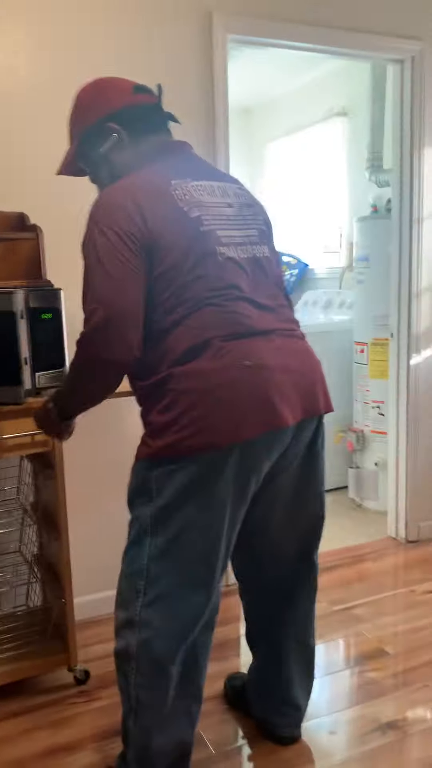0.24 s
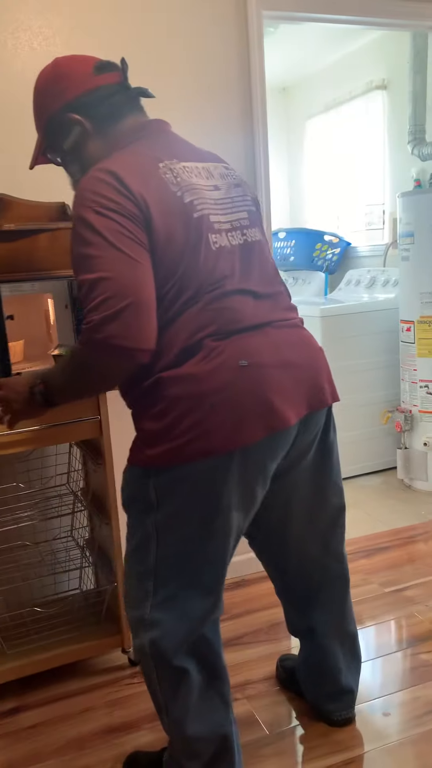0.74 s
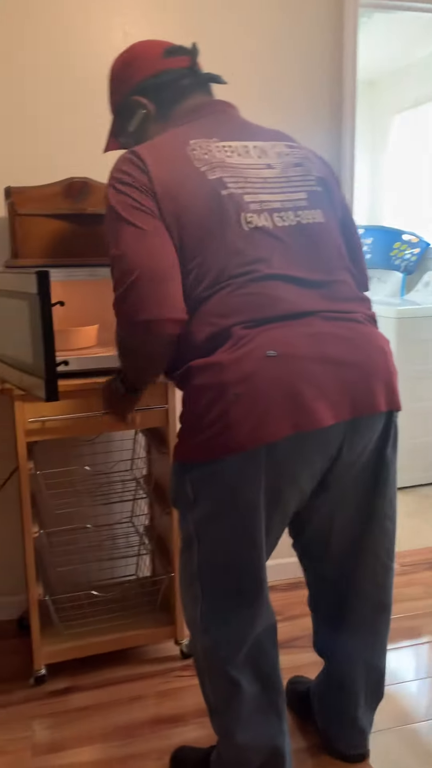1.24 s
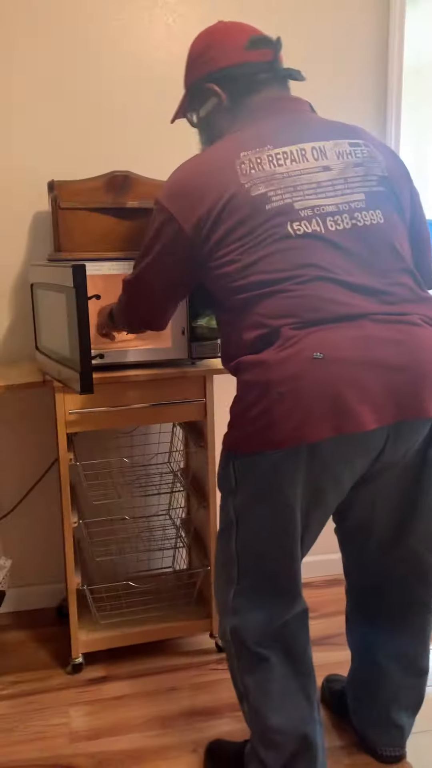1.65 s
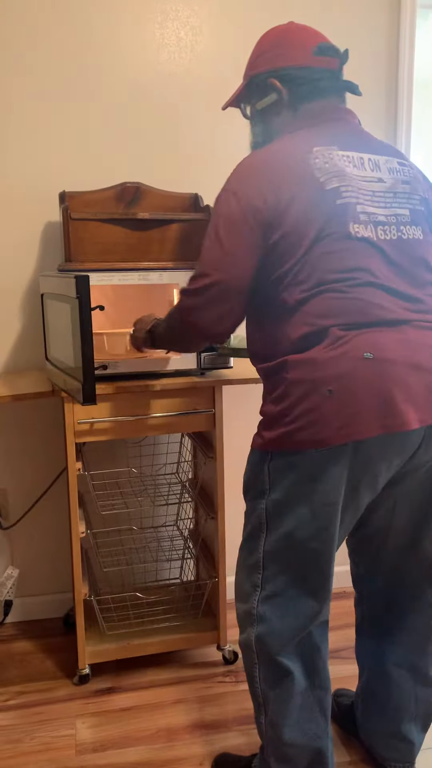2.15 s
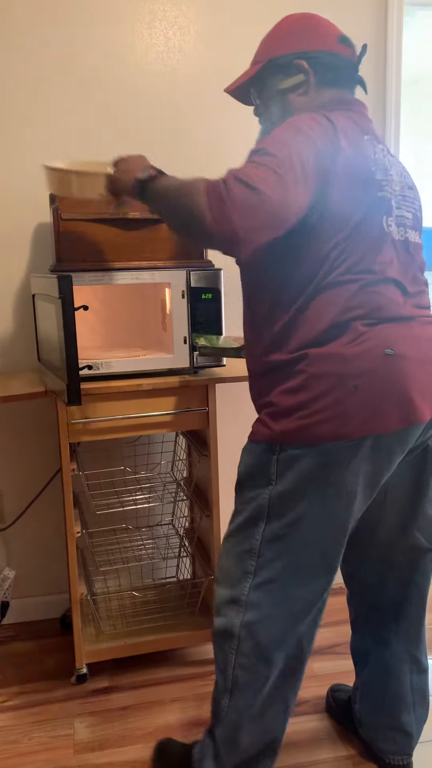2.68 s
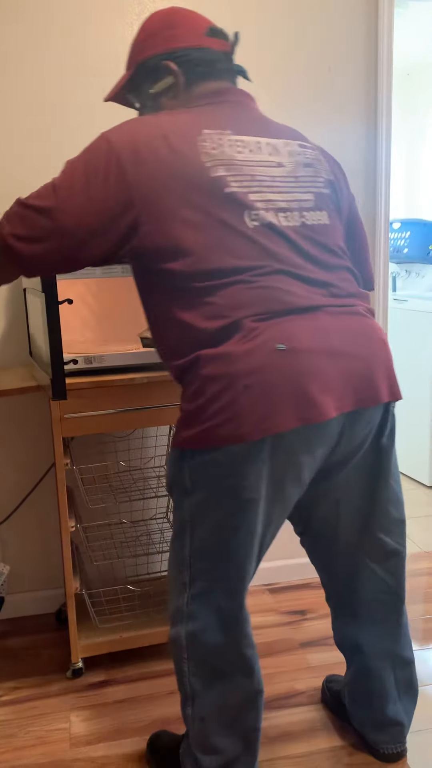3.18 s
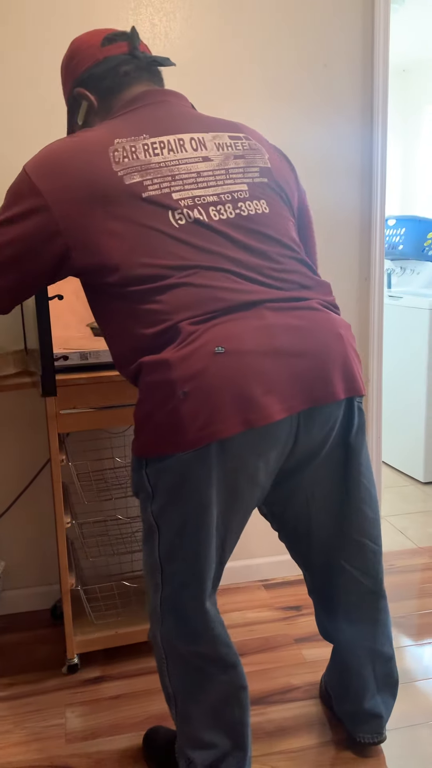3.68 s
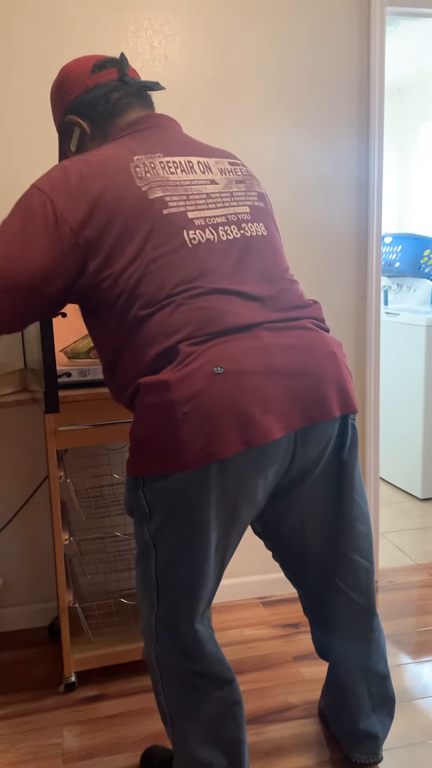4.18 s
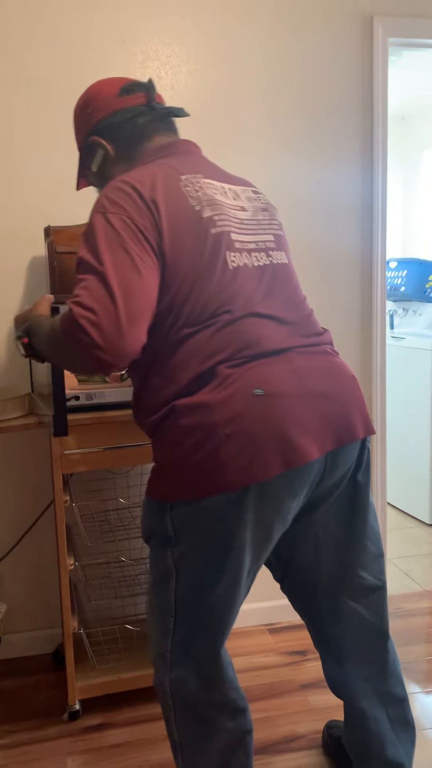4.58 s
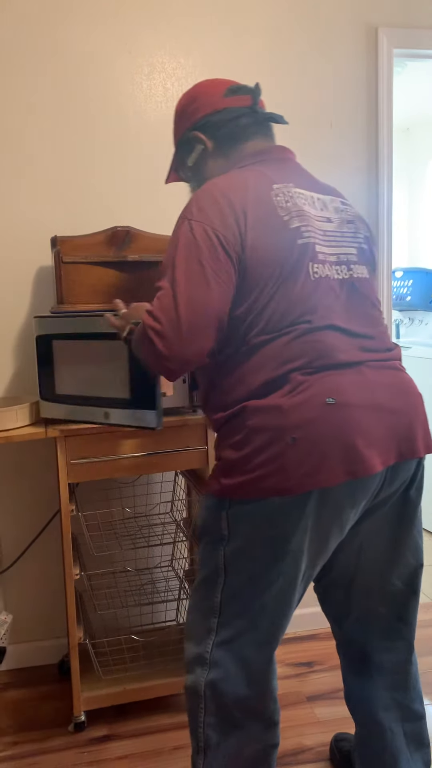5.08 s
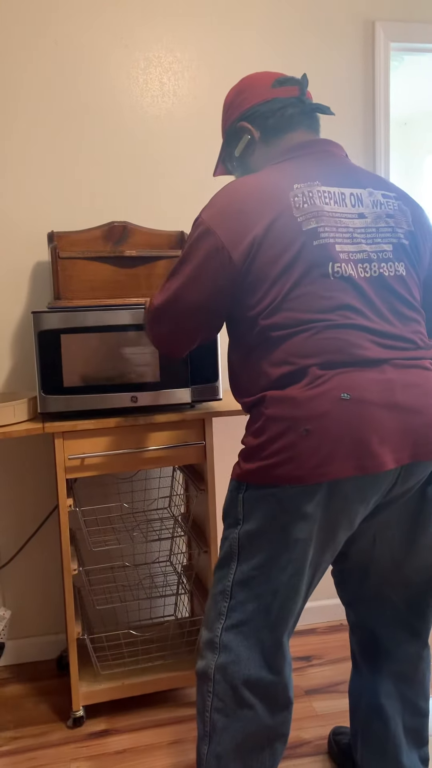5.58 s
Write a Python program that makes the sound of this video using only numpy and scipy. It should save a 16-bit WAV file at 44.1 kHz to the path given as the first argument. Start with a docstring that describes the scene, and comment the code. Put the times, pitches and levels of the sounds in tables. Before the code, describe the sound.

A microwave door unlatches, a tray slides out and lands with a rattle, then the door shudders and snaps shut over a steady kitchen hum.

```python
"""A humming kitchen: a microwave door swings open, a paper tray is slid out and things are set down.
The glass turntable clinks, the door is pushed round with a hollow shudder, and its latch snaps shut.
Blows are short bursts of tiny impacts through a filter; ringing objects are sums of fading tones.
Sliding and moving air are shaped noise, and the motors are wavering tones.
Handling echoes in the room; all is heard by a closely spaced pair of microphones a few metres away."""
import sys
import numpy as np
from scipy import signal
from scipy.fft import rfft, irfft, next_fast_len
from scipy.io import wavfile
from scipy.ndimage import uniform_filter1d

SR = 44100
rng = np.random.default_rng(int(sys.argv[2]) if len(sys.argv) > 2 else 0)


def put_to_file(sound):
    """Save the sound as 16-bit audio at rate SR, in the file named by the first command-line argument."""
    columns = np.atleast_2d(sound).T  # one column per channel
    safe = np.clip(columns, -1, 1)
    whole_steps = np.round(safe * 32767)
    wavfile.write(sys.argv[1], SR, whole_steps.astype(np.int16))


N = 257103
TIME, FREQS = np.arange(N) / SR, np.fft.rfftfreq(N, 1 / SR)

# Levels are those going into the next step; ring levels add to the level of each blow.
# single blows on door, latch, tray and counter: start_s, knock_db, knock_pitch_hz, sharpness_q,
# chatter_s, click_db, click_brightness_db_per_octave
BLOWS = [(0.001, -3, 680, 0.29, 0.035, -18.5, 3), (1.868, -14, 2120, 9.1, 0.073, -40, -14),
         (2.044, -4.5, 910, 12, 0.014, -34, -10), (2.051, -12, 755, 1.9, 0.016, -20.5, -15),
         (2.0905, -5, 1310, 6.2, 0.008, -42, 1), (2.0912, -11.5, 3260, 5.5, .012, -35, -1),
         (2.093, -11.5, 1700, 3.5, 0.022, -42, -3), (3.4142, -3.5, 2150, 0.95, 0.0028, -21.5, 0),
         (3.9787, -9, 610, 4.7, 0.015, -31, 0), (4.416, -11, 2400, 1.5, 0.013, -26, -8),
         (4.694, -10, 700, 0.55, 0.0062, -24, 4), (5.585, -6, 1006, 0.61, 0.029, -17, 5.5),
         (5.62, -11.5, 500, 1.3, .02, -34, 2), (5.772, -10.5, 1100, 0.49, 0.026, -27, 4),
         (5.808, -1.5, 1380, 0.4, 0.061, -8, -12), (5.8195, 1, 1500, 0.54, 0.018, -3, 3),
         (5.8225, 14.5, 497, 0.92, 0.024, 5.5, 6)]
# tone colour of every knock: pitch_hz, level_db
KNOCK_TONE = [(100, 1), (400, 6), (1000, 1.5), (2000, -1), (2600, -6), (3500, -4.5), (4500, -8),
              (7000, -11.5), (16000, -45)]
# tone colour of every click: pitch_hz, level_db
CLICK_TONE = [(500, -51), (2500, 3), (4000, -29), (5500, 6), (7000, 1.5), (9000, -0.5), (12000, -6.5),
              (15000, -11.5)]
# the pushed door jolts unevenly on its hinge: start_s, knock_db, knock_pitch_hz, click_db
DOOR_JOLTS = [(4.711, -19, 795, -30), (4.722, -8.5, 630, -34), (4.7284, -13, 2040, -34),
              (4.736, -18, 1250, -32), (4.748, -7, 394, -38), (4.757, -9.5, 1080, -34),
              (4.771, -6, 384, -41), (4.783, -13.5, 695, -42), (4.791, -14, 1070, -40),
              (4.795, -11, 328, -39), (4.808, -8.5, 353, -41), (4.849, -14, 1070, -45),
              (4.863, -16, 1060, -46), (4.877, -14, 390, -49)]
JOLT_Q, JOLT_CHATTER_S = 6.8, 0.0052
# loose parts of the door that each jolt shakes: pitch_hz, level_db, time_to_fall_60_db_s
DOOR_RING = [(320, -30, 0.097), (385, -33, 0.22), (600, -42, .13), (754, -42, 0.16), (1045, -40, .2),
             (1088, -35, 0.27), (1880, -46, 0.11), (2120, -49, 0.19)]
# the load rattles to rest on the counter in uneven contacts: start_s, knock_db, knock_pitch_hz
LOAD_RATTLE = [(3.419, -4, 950), (3.4235, -12, 1200), (3.431, -8, 720), (3.4428, -5.5, 516),
               (3.4433, -12, 1150), (3.453, -9, 860), (3.462, -17, 1050), (3.486, -7, 477),
               (3.494, -13, 850), (3.507, -15, 560), (3.528, -11, 484)]
RATTLE_Q, RATTLE_CHATTER_S = 4.5, 0.0034
# light ticks of tray, fingers and clothes: start_s, level_db, chatter_s, brightness_db_per_octave
LIGHT_TICKS = [(.815, -31, .0004, 8), (0.8652, -30.5, .0003, 2), (.8664, -30, .0004, 0),
               (2.7298, -35, .0002, 2), (2.737, -28.5, .002, -4), (4.677, -35, .003, 2),
               (4.704, -28, .002, 8), (5.3608, -34.5, 0.0032, 1)]
# ring of the wooden counter, then the short tones of its hard crack:
# pitch_hz, level_db, time_to_fall_60_db_s
COUNTER_RING = [(401.5, -0.5, 0.65), (494, 1.5, 0.66), (590, -5, 0.18), (760, -14, .4), (822, 0, .3),
                (897, 0, 0.24), (994, -2, 0.3), (1055, -4, 0.42), (1240, -8, 0.68), (1631, -8, 0.2),
                (1800, -8, 0.11), (2030, -5, 0.15), (2250, -8, 0.17), (3040, -8, 0.11), (3460, -3, 0.11),
                (895, 11, 0.035), (1500, -5, 0.016), (2126, 8.5, 0.036), (3360, 6, 0.051)]
# the load meets the counter: start_s, level_db, rise_s
COUNTER_HITS = [(3.4137, -35, 0.00037)]
# ring of the oven's thin floor as the tray drops over its edge, then the short tones of the clack:
# pitch_hz, level_db, time_to_fall_60_db_s
FLOOR_RING = [(904, -12, 0.23), (1147, -9, 0.3), (1384, -8, .2), (1422, 1, 0.23), (1610, -9, 0.25),
              (1657, -3, 0.34), (1825, -8, 0.2), (1970, -5.5, 0.38), (2550, -9, 0.17), (3010, -22, 0.22),
              (3010, -5, .12), (3510, -14, 0.11), (1150, 5, 0.032), (1450, 13, 0.025), (1860, 11, 0.034),
              (3450, 8, .02)]
# the tray catches, then drops: start_s, level_db, rise_s
TRAY_DROPS = [(2.051, -49, 0.0011), (2.064, -45, .001), (2.0882, -34.5, 0.0014)]
# ring of the latch spring and its hooks: pitch_hz, level_db, time_to_fall_60_db_s
LATCH_RING = [(1313, 4, 0.18), (2023, -8, 0.25), (2390, -1, 0.13), (3210, 7.5, 0.22)]
# the latch lets go and snaps home: start_s, level_db, rise_s
LATCH_HITS = [(.003, -48, .002), (5.822, -43, .001)]
# ring of the glass turntable: pitch_hz, level_db, time_to_fall_60_db_s
GLASS_RING = [(1010, -1.5, 0.38), (1087, 0.5, 0.51), (1192, -4.5, 0.89), (1630, -4, 0.18), (1960, -5, 0.28),
              (2590, -2, 0.29), (2630, -7, 0.49), (2850, -11, .2), (2955, -6.5, 0.38), (3280, -3, 0.095),
              (3335, -5, 0.39), (3600, -9, 0.15), (3720, -8, 0.76), (3790, -10, .35), (4118, -6, .25),
              (4640, -3, .18), (4900, -1, 0.3), (5437, -18, .3), (6080, -19, .2), (6300, -18, 0.25),
              (6950, -22, 0.18), (7800, -21, 0.25), (9600, -13, .12)]
# the turntable rocks on its rollers: start_s, level_db, rise_s
GLASS_CLINKS = [(4.4145, -40.5, 0.0026), (4.4209, -52, .001), (4.439, -52, .002), (4.482, -53, .002),
                (4.694, -52, 0.0022), (4.77, -54, .002)]
# hollow ring of the oven's steel case and door: pitch_hz, level_db, time_to_fall_60_db_s
CASE_RING = [(171, -2, 0.25), (185, 3.5, 0.18), (201.4, -2.5, 0.29), (235, -15.5, 0.22), (336, -9, 0.4),
             (382, -12, 0.47), (633, -15.5, 0.43), (730, -20, 0.66), (1060, -17, 0.41), (1385, -24, .41)]
# pushes that set the case ringing: start_s, level_db, rise_s
CASE_THUDS = [(0.001, -35, 0.0081), (2.1, -38, 0.0032), (4.702, -21.5, 0.012), (4.79, -28, 0.0022),
              (5.601, -44, 0.013)]
# low boom of the counter's frame: pitch_hz, level_db, time_to_fall_60_db_s
FRAME_RING = [(166, -0.5, 0.24), (232.6, -0.5, 0.39)]
# the frame takes the weight a moment after the counter: start_s, level_db, rise_s
FRAME_HITS = [(3.427, -29.5, .003)]
# dull pushes of tray on cart, hand on door and heel on floor: start_s, level_db, pitch_hz, swell_s
DULL_PUSHES = [(2.098, -29.5, 190.4, 0.011), (4.69, -26, 182, 0.011), (5.625, -43, 42, .035)]
# sliding strokes of hinge, sleeve, tray (in and out) and hand:
# peak_s, level_db, rise_s, fall_s, brightness_db_per_octave
SLIDES = [(0.215, -56, 0.15, 0.033, 21), (1.08, -50, 0.019, 0.053, 1), (2.02, -44, 0.2, 0.17, -4.5),
          (2.4, -54, 0.26, 0.26, -1), (4.7, -45, 0.04, 0.084, 0)]
SLIDE_SHAPE = 1.54  # 1 = pointed, 2 = rounded top
# tone colour of the rubbing: pitch_hz, level_db
RUB_TONE = [(400, -20), (1200, -5), (2200, -7), (4000, -5.5), (6700, -6), (8000, -16), (12000, -21),
            (15000, -23)]
# the sliding tray whistles thinly until it comes free
SQUEAK_START_S, SQUEAK_END_S, SQUEAK_EDGE_S = 2.14, 2.8, 0.033
SQUEAK_DB, SQUEAK_FADE_DB_PER_S = -61, -14
# motor tones of the kitchen appliances, close ones beat: pitch_hz, rms_level_db
MOTORS = [(57.7, -60), (98.8, -57.5), (106.6, -45.5), (115.6, -60.5), (173, -53), (240, -57.5),
          (319.7, -54), (399.7, -57), (866.5, -63)]
# tone colour of the fans' moving air: pitch_hz, level_db
FAN_AIR = [(20, -24), (45, -11.5), (65, -3), (130, -6), (170, 1), (265, -1.5), (400, -1), (560, -4.5),
           (800, -6), (2000, -14), (2700, -19), (4500, -25), (6500, -34), (8500, -43.5), (12000, -45.5),
           (16000, -66)]
FAN_AIR_DB = -38.5
# duct resonances in that air: pitch_hz, width_hz, gain_db
FAN_DUCTS = [(299, 32, 6.5), (426, 41, 5), (528, 54, -3.5), (766, 30, 4.5), (1435, 37, 4), (1650, 67, 3),
             (2045, 210, 5), (6370, 1330, 5.5)]
# how long the room's echoes last: pitch_hz, time_to_fall_60_db_s
ROOM_ECHO = [(100, 0.38), (400, 0.54), (1500, 0.57), (4000, 0.49), (8000, 0.61), (16000, 0.12)]
# share of the left-right difference the microphones keep: pitch_hz, level_db
PAIR_WIDTH = [(100, -56), (300, -13.5), (500, -7), (730, -3.5), (1200, -4.5), (2000, -8), (2800, -1.5),
              (3700, -5.5), (4700, -20), (8000, -134)]
# how far the left microphone is ahead: pitch_hz, lead_radians
PAIR_LEAD = [(0, 0), (400, -.3), (520, -.8), (1100, -.8), (1300, -.1), (2550, .5), (4700, np.pi),
             (17500, 7 * np.pi)]
# left level minus right level: pitch_hz, difference_db
PAIR_BALANCE = [(60, 0.9), (350, 2.5), (520, 1), (800, -1.5), (1300, -0.5), (3000, -0.5), (4500, 2)]
EDGE_HZ = 15750  # top of the heard band


def amp(db):
    """Turns decibels into a gain."""
    return 10 ** (np.asarray(db) / 20)


def unit(x):
    """Scales to an rms of 1."""
    return x / np.sqrt(np.mean(x ** 2) + 1e-20)


def read(points, hz):
    """Reads a table between its points on a log-frequency axis."""
    f, value = np.transpose(points)
    return np.interp(np.log(hz + 1), np.log(f + 1), value)


def add(mix, s, sound):
    """Mixes a sound in at time s."""
    part = mix[max(round(s * SR), 0):][:len(sound)]
    part += sound[:len(part)]


def noise(db):
    """Two unrelated channels of noise with the spectrum db, scaled to an rms of 1."""
    return unit(irfft(rfft(rng.standard_normal((2, N))) * amp(db), N))


def drift(rate_hz):
    """Random wandering of rms 1, mostly slower than rate_hz."""
    spectrum = rfft(rng.standard_normal(N)) / (1 + (FREQS / rate_hz) ** 4)
    return unit(irfft(spectrum, N))


def impulse(colour, size=2048):
    """Pulse of energy 1 that starts at once and has the spectrum colour(Hz) in dB."""
    log_gain = np.log(amp(colour(abs(np.fft.fftfreq(size, 1 / SR)))))
    # the phase that follows from the gain puts the energy as early as possible
    pulse = np.fft.ifft(np.exp(np.conj(signal.hilbert(log_gain)))).real
    return pulse / np.linalg.norm(pulse)


def contact(chatter, first_s=0.00074, lead=0.59, size=8192):
    """One impact, then a dying chatter of tiny ones; energy 1."""
    t = np.arange(size) / SR
    strength = np.sqrt(chatter / (chatter + first_s) / (first_s * SR))
    force = strength * rng.standard_normal(size) * np.exp(-t / chatter)
    force[0] = lead
    return force / np.linalg.norm(force)


def knock(db, hz, q, chatter):
    """One blow excites one resonance; a higher q makes it narrower."""
    def body(f):
        resonance = 1 + (q * (f / hz - hz / (f + 1))) ** 2
        return read(KNOCK_TONE, f) - 10 * np.log10(resonance)
    return amp(db) * signal.fftconvolve(contact(chatter), impulse(body))


def clicks(touches):
    """Hard surfaces meet with a click, brighter for plastic; rows: start_s, chatter_s, db, db per octave."""
    out = np.zeros(N)
    for s, chatter, db, bright in touches:
        def colour(f):
            return read(CLICK_TONE, f) + bright * np.log2(np.maximum(f / 5000, 1))
        add(out, s, amp(db) * signal.fftconvolve(contact(chatter), impulse(colour)))
    return out


def ring(modes, rise, twin, split_hz=7, twin_from_hz=350):
    """Fading tones swell in; each has a close twin, so it beats, and high tones have the strongest twins."""
    t = np.arange(SR) / SR
    out = np.zeros(SR)
    for hz, db, t60 in modes:
        turns = hz * t + rng.random()
        split = split_hz * rng.uniform(-2, 2) * np.sqrt(hz / 1000)
        twin_turns = turns + split * t + rng.choice([-1, 1]) / 4  # starts a quarter turn away
        share = twin * hz / (hz + twin_from_hz)
        pair = np.sin(2 * np.pi * turns) + share * np.sin(2 * np.pi * twin_turns)
        out += amp(db - 60 * t / t60) * pair
    return out * (1 - np.exp(-t / rise))


def struck(modes, blows, rough=0.0, rough_hz=60, twin=1.0):
    """An object rings with its own tones after each blow; if it lies loose, the ring flutters."""
    out = np.zeros(N)
    for s, db, rise in blows:
        add(out, s, amp(db) * ring(modes, rise, twin=twin))
    return out * (1 + rough * drift(rough_hz)) / np.sqrt(1 + rough ** 2)


def knocks():
    """The single blows on door, latch, tray and counter each excite a resonance."""
    out = np.zeros(N)
    for s, db, hz, q, chatter, _, _ in BLOWS:
        add(out, s, knock(db, hz, q, chatter))
    return out


def snaps():
    """The same blows also click where hard surfaces meet."""
    return clicks([(s, chatter, db, bright) for s, _, _, _, chatter, db, bright in BLOWS])


def shudder(rise=0.00076, bright=1.0):
    """Each jolt of the door knocks and clicks once and leaves its loose parts ringing."""
    out = np.zeros(N)
    for s, db, hz, _ in DOOR_JOLTS:
        add(out, s, knock(db, hz, JOLT_Q, JOLT_CHATTER_S))
    parts = struck(DOOR_RING, [(s, db, rise) for s, db, _, _ in DOOR_JOLTS])
    rattle = clicks([(s, JOLT_CHATTER_S, db, bright) for s, _, _, db in DOOR_JOLTS])
    return out + parts + rattle


def settling():
    """After landing on the counter the load rattles to rest in separate knocks."""
    out = np.zeros(N)
    for s, db, hz in LOAD_RATTLE:
        add(out, s, knock(db, hz, RATTLE_Q, RATTLE_CHATTER_S))
    return out


def panels():
    """The counter, the oven floor and the latch ring when hit; the floor lies loose and flutters."""
    counter = struck(COUNTER_RING, COUNTER_HITS)
    oven_floor = struck(FLOOR_RING, TRAY_DROPS, rough=.2, twin=.7)
    latch = struck(LATCH_RING, LATCH_HITS)
    return counter + oven_floor + latch


def turntable():
    """The loose glass plate rings with a flutter as it rocks on its rollers."""
    return struck(GLASS_RING, GLASS_CLINKS, rough=.4, rough_hz=70, twin=.6)


def boom():
    """The steel case and the counter's frame ring low after each push or load."""
    return struck(CASE_RING, CASE_THUDS) + struck(FRAME_RING, FRAME_HITS)


def pushes(steepness=3):
    """A few low cycles that swell and die with no ring."""
    out, t = np.zeros(N), np.arange(SR) / SR
    for s, db, hz, swell in DULL_PUSHES:
        shape = (t / swell * np.exp(1 - t / swell)) ** steepness
        add(out, s, amp(db) * shape * np.sin(2 * np.pi * hz * t))
    return out


def ticks():
    """Light touches of tray, fingers and clothes make small clicks."""
    return clicks([(s, chatter, db, bright) for s, db, chatter, bright in LIGHT_TICKS])


def rubbing(grain_db=1.5, squeak_hz=6700, squeak_width_hz=170):
    """Grainy friction noise swells and fades with each stroke; the tray adds a whistle of narrow noise."""
    hiss = np.zeros((2, N))
    for s, db, rise, fall, bright in SLIDES:
        distance = np.maximum((s - TIME) / rise, (TIME - s) / fall)
        swell = np.exp(-distance ** SLIDE_SHAPE)
        colour = read(RUB_TONE, FREQS) + bright * np.log2((FREQS + 200) / 5000)
        hiss += amp(db) * swell * noise(np.where(FREQS < EDGE_HZ, colour, -np.inf))
    sliding = np.clip(np.minimum(TIME - SQUEAK_START_S, SQUEAK_END_S - TIME) / SQUEAK_EDGE_S, 0, 1)
    whistle = noise(-20 * np.log10(1 + ((FREQS - squeak_hz) / squeak_width_hz) ** 2))
    whistle *= sliding * amp(SQUEAK_DB + SQUEAK_FADE_DB_PER_S * (TIME - SQUEAK_START_S))
    return amp(grain_db * drift(70)) * (hiss + whistle)


def hum(waver=0.16, flutter=0.082):
    """Motor tones waver a little in phase (radians per 100 Hz of pitch) and in strength."""
    out = np.zeros(N)
    for hz, db in MOTORS:
        strength = np.sqrt(2) * amp(db) * (1 + flutter * drift(27))
        phase = 2 * np.pi * (hz * TIME + rng.random()) + waver * hz / 100 * drift(1.85)
        out += strength * np.sin(phase)
    return out


def air(fizz_db=-79, swell_db=0.59, ripple_db=2.5):
    """Fan noise coloured by its ducts and by the room's standing waves, over a faint even hiss."""
    ducts = sum(db / (1 + (2 * (FREQS - hz) / width) ** 2) for hz, width, db in FAN_DUCTS)
    ripple = unit(uniform_filter1d(rng.standard_normal(len(FREQS)), size=100))
    standing = ripple_db * ripple * FREQS / (FREQS + 300)  # weak in the bass
    fans = amp(FAN_AIR_DB + swell_db * drift(1.0)) * noise(read(FAN_AIR, FREQS) + ducts + standing)
    return fans + amp(fizz_db) * noise(0 * FREQS)


def kitchen(x, wet_db, gap_s=0.0026, treble_db=-4):
    """Direct sound plus dense reflections from hard walls and floor; the highest treble dies first."""
    echoes = rng.random((2, SR)) < 4000 / SR  # about 4000 a second
    taps = rng.standard_normal((2, SR)) * echoes * (np.arange(SR) > gap_s * SR)
    hz, t, z = signal.stft(taps, SR, nperseg=256)
    decay = amp(-60 * t / read(ROOM_ECHO, hz)[:, None])
    decay *= amp(treble_db * hz / (hz + 5000))[:, None] / np.sqrt((decay[hz < 2000] ** 2).mean())
    tail = signal.istft(z * decay, SR, nperseg=256)[1] / np.linalg.norm(taps[0])
    return x + amp(wet_db) * signal.fftconvolve(x[None], tail, axes=1)[:, :N]


def scene():
    """Handling sounds, most with room echoes, over the steady hum and air."""
    out = kitchen(knocks(), wet_db=3) + kitchen(snaps(), wet_db=1.5)
    out += kitchen(shudder(), wet_db=-1)
    out += kitchen(settling(), wet_db=1)
    out += kitchen(panels(), wet_db=-5)
    out += kitchen(turntable(), wet_db=-5)
    out += kitchen(boom() + pushes(), wet_db=-7)
    out += kitchen(ticks(), wet_db=6.0)
    return out + rubbing() + hum() + air()


def record(dry):
    """The pair shares deep bass and high treble; level and phase differ with pitch, then a low-pass."""
    size = next_fast_len(N + 8192)
    hz = np.fft.rfftfreq(size, 1 / SR)
    left, right = rfft(dry, size)
    sides = np.array([[1], [-1]])  # left, right
    pair = (left + right) / 2 + sides * amp(read(PAIR_WIDTH, hz)) * (left - right) / 2
    lead = np.interp(hz, *np.transpose(PAIR_LEAD))
    # each side takes half of the level and phase difference
    pair = pair * amp(sides * read(PAIR_BALANCE, hz) / 2) * np.exp(.5j * sides * lead)
    low_pass = signal.firwin(511, EDGE_HZ, window=("kaiser", 9), fs=SR)
    return signal.oaconvolve(irfft(pair, size)[:, :N], low_pass[None], "same")


dry = scene()
out = record(dry)
put_to_file(out)
```